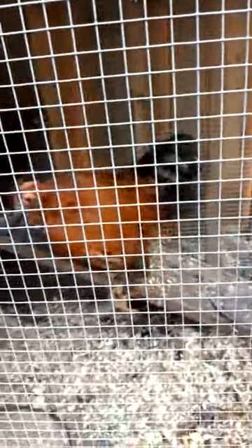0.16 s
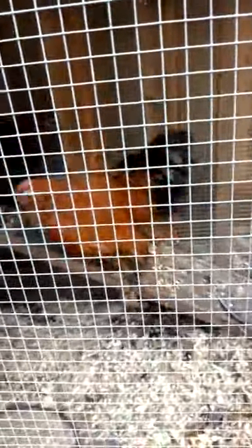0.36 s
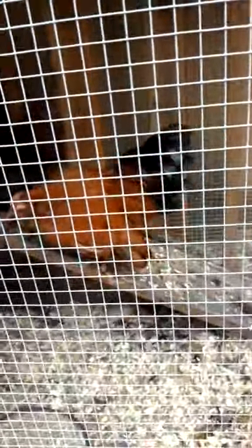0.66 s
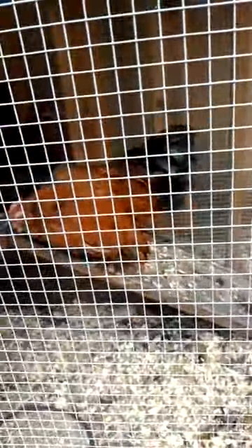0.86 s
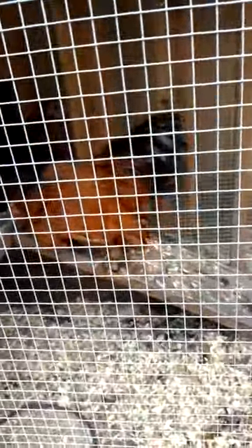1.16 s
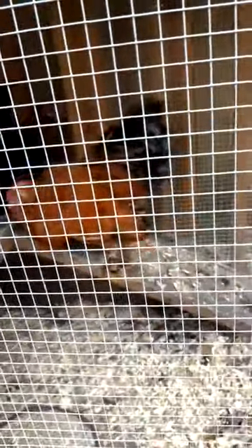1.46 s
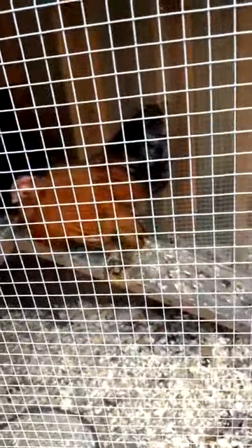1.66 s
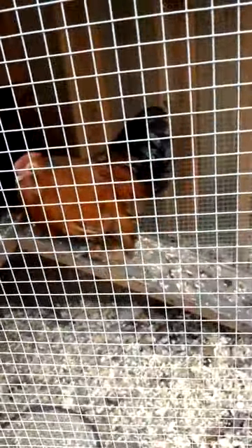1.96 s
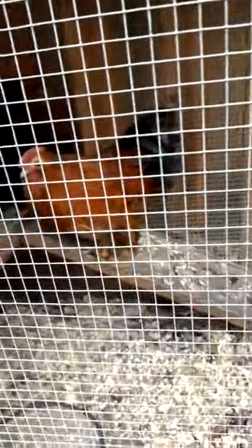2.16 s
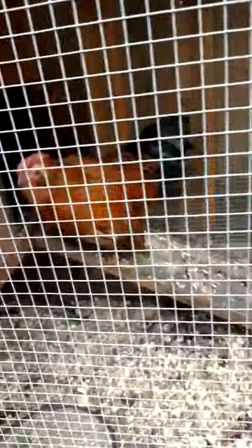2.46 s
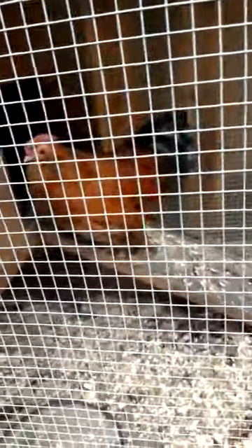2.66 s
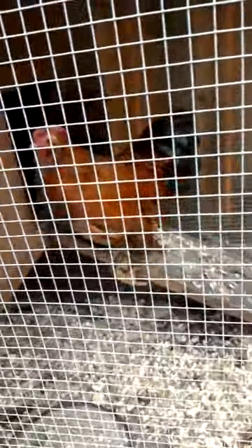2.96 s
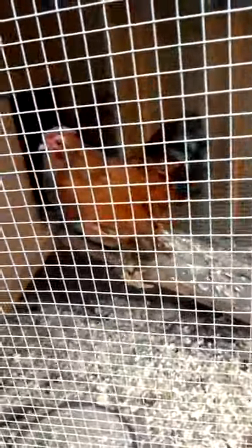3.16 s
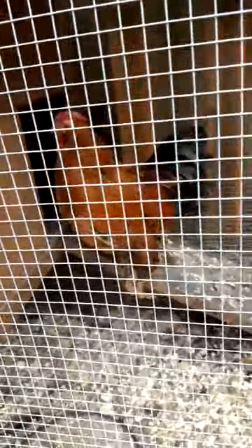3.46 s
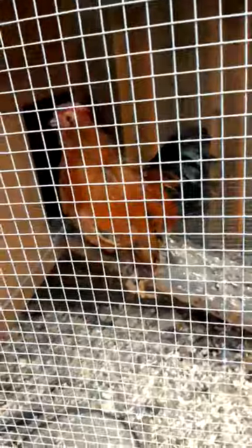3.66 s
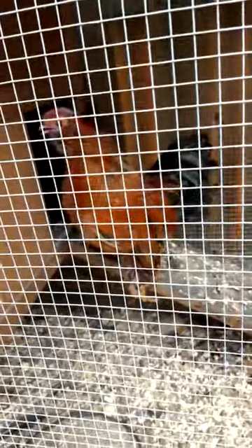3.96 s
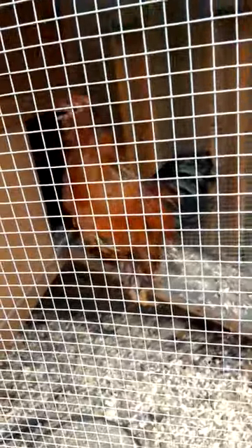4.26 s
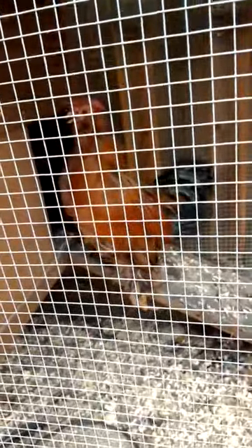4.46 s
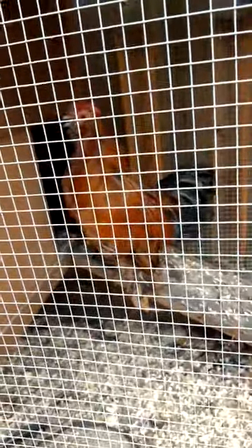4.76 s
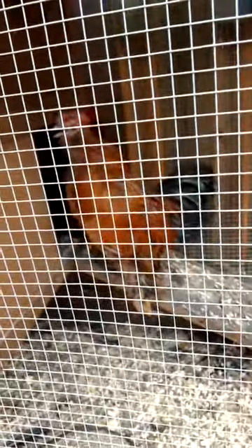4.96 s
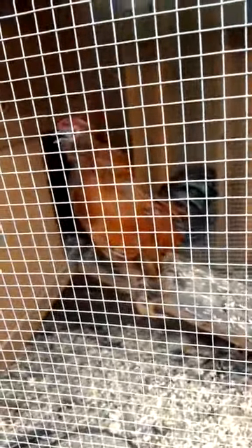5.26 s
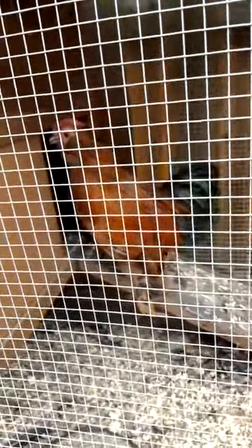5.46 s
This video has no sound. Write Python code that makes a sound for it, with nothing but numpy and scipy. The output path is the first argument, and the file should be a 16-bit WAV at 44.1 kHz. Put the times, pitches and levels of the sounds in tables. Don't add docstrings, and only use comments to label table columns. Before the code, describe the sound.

Close outdoor view of a wire-fronted wooden coop. A few low, soft clucks open, with claws ticking in shavings and toes thudding on a plank. Faint traffic hum and a thin, high songbird buzz sit far behind. After four seconds a small rooster crows loudly: a short note, a tiny gap, then a long breaking note that falls away as the background ducks.

```python
import sys
import numpy as np
from scipy import signal
from scipy.fft import rfft, irfft, next_fast_len
from scipy.io import wavfile
from scipy.ndimage import uniform_filter1d, minimum_filter1d, map_coordinates

SR = 44100
rng = np.random.default_rng(int(sys.argv[2]) if len(sys.argv) > 2 else 0)


def convert_level_to_amplitude(level_db):
    exponent = np.asarray(level_db, float) / 20
    return 10 ** exponent


def output_pcm(signal):
    pcm = np.clip(np.atleast_2d(signal).T, -1, 1) * 32767
    wavfile.write(sys.argv[1], SR, np.round(pcm).astype(np.int16))


N = 247401

# time_s, traffic_db, shavings_rustle_db
AIR = [(0.0, -60.5, -82), (0.35, -64.5, -79), (0.63, -67, -84), (1.0, -64, -92), (1.2, -67.5, -90),
       (1.39, -62, -84), (1.61, -67, -96), (1.9, -67, -84), (2.23, -67, -90), (2.57, -68, -92),
       (2.9, -66, -80), (3.2, -69, -93), (3.64, -67, -95), (4.1, -69.5, -92)]
# frequency_hz, density_db
TRAFFIC = [(25, -21.5), (62, 6), (139, -6), (500, -19.5), (772, -26), (1050, -19), (2500, -33.5),
           (4500, -120)]
# frequency_hz, density_db
HISS = [(900, -33), (1500, -7.5), (2900, -9), (5500, -14), (7700, -25), (10000, -22.5), (15700, -12)]
# frequency_hz, level_db
ENGINE = [(107.7, -66.5), (172.3, -68.5), (274.5, -73.5), (393.0, -78.5), (565.2, -88)]
# time_s, level_db
PASSING = [
    (2.7, -12),
    (3.0, -9),
    (3.55, 2),
    (3.9, -3),
    (4.1, -4),
]
# time_s, gain_db
GAIN = [
    (4.1, 7.5),
    (4.2, 4),
    (4.6, 9.5),
    (5.0, -5.5),
    (5.6, 2),
]
# start_s, length_s, level_db, pitch_hz
CHEEPS = [
    (0.94, .035, -62, 8000),
    (1.033, .12, -79, 3960),
]
# start_s, length_s, level_db
BUZZ = [
    (0.99, 0.21, -59),
    (2.048, 0.23, -59),
    (2.809, 0.304, -58),
    (3.46, 0.29, -56.5),
]
# frequency_hz, t60_s
COOP = [(500, 0.16), (1600, 0.16), (4200, 0.2), (11000, 0.15)]

# start_s, level_db, bright_over_hollow_db, t60_s
TICKS = [(0.14, -59, 7, .1), (0.1485, -54.5, 9, 0.14), (0.158, -39.5, 9.5, 0.095), (.2144, -28, 4, 0.033),
         (0.22, -35, 7, 0.03), (0.278, -38, 3.5, 0.084), (0.377, -56.5, 1.5, 0.071),
         (0.4356, -55, 6, 0.089), (0.4622, -47, -12, 0.044), (0.5023, -49, 7.5, 0.097),
         (0.566, -61.5, -3, 0.12), (0.8646, -60.5, 4, 0.097), (0.921, -41.5, 2, 0.051),
         (.966, -38, 2, 0.068), (1.3325, -53, -3.5, 0.081), (1.3383, -51, -16, 0.077),
         (1.424, -55, -3, 0.22), (1.432, -58, -13, 0.14), (1.8987, -52.5, 6, 0.056),
         (1.9377, -64, 1, 0.093), (1.981, -57.5, -7.5, 0.19), (2.0478, -42.5, -1, 0.063),
         (2.376, -36.5, 11.5, 0.059), (2.4018, -44.5, -2.5, 0.058), (2.4904, -63, -.5, 0.05),
         (2.5285, -54.5, -0.5, 0.16), (2.553, -48.5, 10, 0.053), (2.5948, -50, 4, 0.054),
         (2.7696, -49.5, 8.5, 0.1), (2.859, -62, 8, 0.11), (2.9388, -53, 5, 0.06), (3.085, -59, -12, .05)]
# start_s, level_db
THUDS = [(.1486, -44), (.161, -42), (.2144, -45), (0.279, -45.5), (.3513, -55), (.3759, -59), (.5039, -67),
         (.5654, -58), (0.8655, -60), (0.9197, -25), (.966, -39.5), (1.3365, -42.5), (1.4249, -45),
         (2.0485, -44), (2.376, -59), (2.5275, -54), (2.543, -46), (2.5532, -43), (2.5957, -48),
         (2.63, -54), (2.9392, -55)]
# start_s, level_db, ring_hz
RAPS = [(.2144, -38, 3500), (.2155, -42, 1650), (.5019, -51, 10000), (.921, -46, 3500), (.9225, -38, 830),
        (.966, -46, 8500), (1.3365, -45, 1650), (1.3374, -46, 1200), (1.429, -43, 1500), (1.431, -46, 4200),
        (1.8987, -51, 4300), (1.9375, -57, 8600), (1.985, -56, 8400), (2.0478, -46, 8800),
        (2.376, -50, 9000), (2.4016, -54, 4100), (2.5955, -52, 3310), (2.77, -56, 2750), (2.772, -49, 9000)]
# frequency_hz, width_hz, level_db
PLANK = [(169, 29, -13), (402, 53, 2.5), (610, 120, -9), (950, 210, -16.5)]
# frequency_hz, density_db
HOLLOW = [(880, -17), (1500, -5.5), (2880, -14), (3580, -4), (4620, -5.5), (5500, -10), (7150, -17),
          (12100, -120)]
# frequency_hz, density_db
BRIGHT = [(3240, -33.5), (5500, 0.5), (6420, -4.5), (8730, 2.5), (9740, 1.5), (14500, -18), (15700, -25.5)]

# start_s, length_s, pitch_hz, level_db, overtones_db
CLUCKS = [
    (0, 0.054, 402, -37.5, 5.5),
    (0.057, 0.0227, 382, -44.5, 6),
    (0.134, 0.0514, 428, -38.5, 10.5),
    (0.306, 0.0052, 350, -31.5, 14),
]
# frequency_hz, width_hz, level_db
HEN_THROAT = [(403, 62, 16), (810, 210, 2), (1260, 420, -4.5), (1600, 77, -5.5), (1920, 130, -14),
              (2290, 300, -34)]
# time_s, pitch_hz, level_db
PEEP = [
    (.287, 1046, -72),
    (.293, 950, -39),
    (.303, 700, -51),
]
CLUCK_SAG, CLUCK_SCOOP = 56, 0.019
CLUCK_ATTACK_S, CLUCK_FADE_DB, BEAK_SHUT_DB_PER_S = 0.009, 7.5, 192

NOTES = [
    [(4.114,), (4.285,)],
    [(4.408,), (5.455,)],
]
# start_s, first_hz, middle_hz, last_hz, chaos_periods
REGISTERS = [(4.114, 890, 895, 900, .07), (4.137, 900, 915, 928, .012), (4.15, 928, 942, 955, .003),
             (4.167, 909, 929, 922, .002), (4.231, 920, 920, 920, .2), (4.268, 915, 905, 900, .05),
             (4.407, 930, 900, 850, .03), (4.413, 825, 845, 885, .004), (4.425, 900, 960, 1040, .004),
             (4.434, 1085, 1170, 1208, .006), (4.447, 1210, 1228, 1215, .002),
             (4.476, 1215, 1198, 1165, .022), (4.497, 1150, 1095, 1065, .025), (4.513, 985, 940, 925, .02),
             (4.526, 1000, 1000, 960, .13), (4.561, 935, 912, 930, .055), (4.579, 930, 925, 920, .08),
             (4.596, 905, 935, 990, .018), (4.612, 1000, 1020, 1040, .08), (4.619, 1080, 1120, 1150, .03),
             (4.648, 1150, 1179, 1182, .001), (4.692, 1182, 1105, 1085, .001),
             (4.719, 1085, 1070, 1052, .04), (4.733, 1040, 1025, 1000, .08), (4.748, 950, 945, 950, .075),
             (4.765, 920, 935, 975, .016), (4.787, 1057, 1042, 1011, .0024), (4.937, 950, 944, 941, .02),
             (4.949, 941, 925, 899, .0012), (5.235, 938, 944, 947, .03), (5.258, 946, 944, 925, .002),
             (5.325, 921, 915, 905, .004), (5.355, 905, 890, 866, .01), (5.401, 866, 832, 780, .012),
             (5.424, 770, 610, 400, .04)]
ONSET_CHAOS, ONSET_S = .15, .004
SLIDE_CHAOS, SLIDE_S = 2e-6, .006
SLIDE_FREE, SLIDE_TOP = 600, 3500
# time_s, delay_periods
DOUBLING = [
    (5.236, 0),
    (5.238, .08),
    (5.34, .075),
    (5.41, .045),
    (5.43, .14),
]
# frequency_hz, width_hz, level_db
PIPE = [(870.7, 100, 0), (1921, 149, -3), (2330, 275, -2), (3256, 84, -5.5), (4450, 260, -44),
        (4668, 214, -6), (5740, 340, -56), (7537, 217, -10), (8175, 80, -6.5), (9040, 330, -27.5),
        (10010, 480, -31), (12800, 190, -31.5), (14100, 740, -40), (15500, 600, -44)]
# frequency_hz, width_hz, level_db
GAPING = [(949, 64, -6), (1656, 183, -10), (2358, 160, -5.5), (3266, 290, -13.5), (4706, 234, -1),
          (5330, 810, -27), (7460, 550, -28.5), (9525, 170, -13), (10850, 460, -25), (14000, 900, -53.5)]
# frequency_hz, width_hz, depth_share
SHUT_NOTCH = (6180, 300, 0.51)
PIPE_EDGES_HZ = [1330, 4000, 6200, 8900]
SHUT_DB = [1, -5, -13, -8, -7]
WIDE_DB = [1.5, -6, -13, -11.5, -10]
PRESS_SHARE = [0.021, 0.79, 0.85, 0.78, 0.76]
AIM_SHARE = [0.25, 0.048, 0.55, 0.6, 1.33]
# time_s, level_db
AIM = [(4.125, -17), (4.145, 10), (4.168, 5), (4.19, 1), (4.26, 3.5), (4.42, 0.5), (4.6, 1), (4.78, -4),
       (4.87, -10), (4.95, 1), (5.12, 2), (5.21, 6.5), (5.3, 0), (5.42, -2)]
# time_s, level_db, beak_opening_share, pressing_db
SHORT = [
    [(4.114, -45.5, 0.65, 11.5), (4.121, -39.5, 0.1, 13), (4.13, -10, 0, 8), (4.139, -1.5, 0, -2.5),
     (4.155, -3, 0.05, -2), (4.168, -5, 0.07, -1.5)],
    [(4.18, -4.5, .21, 0.5), (4.228, -3.5, 0.3, -3.5), (4.24, -12.5, .4, 13), (4.26, -11.5, 0.33, 14.5),
     (4.272, -11, 0.15, -4.5), (4.285, -17.5, .35, 0)],
]
# time_s, level_db, beak_opening_share, pressing_db
WARBLE = [
    [(4.408, -30.5, 1, 6.5), (4.418, -9, 0.97, 1.5), (4.431, -1, .89, -7.5), (4.44, -7, 0.81, 4.5),
     (4.466, -4, 0.99, 7.5), (4.49, -8, 0.6, -1), (4.508, -2.5, 0.7, -3), (4.52, -2.5, 0.6, -9),
     (4.538, -20, 1, 22)],
    [(4.555, -14, 0.83, 9), (4.568, -5.5, 1, 0.5), (4.585, -3.5, 0.72, -0.5), (4.593, -8.5, 0.93, 6),
     (4.607, -3, .83, 0), (4.614, -10.5, 0.64, 1.5), (4.623, -7, 0.66, 6)],
    [(4.65, -10.5, .88, 6.5), (4.675, -6.5, 1, 1), (4.715, -10, 0.57, 3), (4.74, -5, 0.94, 7),
     (4.762, -8, 0.71, 2.5), (4.778, -2, .78, -0.5), (4.787, -2.5, 0.54, -8)],
]
# time_s, level_db, beak_opening_share, pressing_db
HELD = [
    [(4.795, -6.5, 0.44, 4.8), (4.81, 1.5, 0.49, 5), (4.87, -14, 0.6, 1.2), (4.93, -10, 0.51, 7.5)],
    [(4.945, -7.5, 0.28, 0.5), (5.1, -8, 0.095, -0.5), (5.228, -6.5, 0.1, -1), (5.245, -10.5, 0.29, -0.5),
     (5.285, -10, .25, 2), (5.37, -8.5, 0.37, -7.5), (5.4, -7, 0.25, 3), (5.42, -15, 0.31, 0),
     (5.455, -30.5, 0.32, -11.5)],
]
# frequency_hz, level_db
WHISTLE = [(830, -10), (1650, -10), (2490, 3), (3230, -4), (4070, -19.5), (4890, -22), (9800, -9.5)]
# frequency_hz, level_db
RASP = [(1560, -6.5), (1875, 0.5), (2160, 2.5), (2370, -7), (2830, -9.5), (3050, -16), (3250, -12),
        (4400, -13), (7350, -8.5), (8050, -13.5)]
# start_s, length_s, level_db
WHISTLES = [
    (4.419, 0.02, -21),
    (4.52, 0.018, -18),
    (4.54, .024, -25.5),
    (4.582, 0.017, -13),
    (4.605, 0.041, -17.5),
    (4.738, 0.03, -12.5),
    (5.238, 0.028, -20),
    (5.411, 0.034, -29),
]
# start_s, length_s, level_db
RASPS = [
    (4.12, 0.023, -26.5),
    (4.228, 0.052, -16.5),
]


def unit(x):
    return x / np.sqrt(np.mean(x ** 2) + 1e-20)


def along(points, hz):
    f, v = np.transpose(points)
    return np.interp(np.log(hz + 1), np.log(f + 1), v)


def curves(rows):
    s, *cols = np.transpose(rows)
    return [np.interp(np.arange(N) / SR, s, c) for c in cols]


def within(starts, lengths):
    t = np.arange(N) / SR
    k = np.maximum(np.searchsorted(starts, t) - 1, 0)
    return k, np.clip((t - starts[k]) / lengths[k], 0, 1)


def sounding(tables, fade):
    t = np.arange(N) / SR
    gates = []
    for rows in tables:
        inside = np.minimum(t - rows[0][0], rows[-1][0] - t)
        gates.append(np.clip(inside / fade + 1, 0, 1))
    return np.max(gates, axis=0)


def wobble(rate):
    at = np.arange(0, N + 8, 8)
    knots = rng.standard_normal(int(N * rate / SR) + 4)
    return np.interp(np.arange(N), at, map_coordinates(knots, [at * rate / SR], order=2))


def filtered(x, response):
    m = next_fast_len(len(x) + 8192)
    return irfft(rfft(x, m) * response(np.fft.rfftfreq(m, 1 / SR)), m)[:len(x)]


def resonances(modes):
    def response(f):
        total = 0
        for k, (centre, width, db) in enumerate(modes):
            damping = 1j * f * width
            total = total + (-1) ** k * convert_level_to_amplitude(db) * damping / (centre ** 2 - f ** 2 + damping)
        return total
    return response


def noise(spectrum, size=N):
    return unit(filtered(rng.standard_normal(size), lambda hz: convert_level_to_amplitude(along(spectrum, hz))))


def steady(x, span):
    return x / np.sqrt(np.abs(uniform_filter1d(x ** 2, int(span * SR))) + 1e-12)


def pulses(pitch_hz, chaos, late, scatter, weak):
    turns = np.cumsum(pitch_hz) / SR
    k = np.arange(1, int(turns[-1]))
    at = np.interp(k, turns, np.arange(N))
    i = at.astype(int)
    luck = rng.standard_normal((N // 20, 2))[:len(k)]
    swing = late[i] * (-1) ** k
    at = at + (chaos[i] * luck[:, 0] + swing) * SR / pitch_hz[i]
    size = 1 + scatter * chaos[i] * luck[:, 1] - weak * swing
    taps = np.floor(at)[:, None] + np.arange(-15, 17)
    offset = taps - at[:, None]
    shape = np.sinc(offset) * np.cos(np.pi * offset / 32) ** 2
    return np.bincount(np.clip(taps, 0, N - 1).astype(int).ravel(), (size[:, None] * shape).ravel(), N)


def patchy(x, depth_db):
    z = signal.stft(x, nperseg=512)[2]
    field = rng.standard_normal(z.shape)
    for axis in (-2, -1, -2, -1):
        field = uniform_filter1d(field, size=7, axis=axis)
    return signal.istft(z * convert_level_to_amplitude(depth_db * unit(field)), nperseg=512)[1][..., :N]


def air():
    traffic_db, rustle_db = curves(AIR)
    hum = noise(TRAFFIC) * convert_level_to_amplitude(traffic_db + 1.2 * wobble(3.2) + 0.53 * wobble(17))
    turns = np.cumsum(1 + 0.071 * wobble(7.9)) / SR
    engine = sum(convert_level_to_amplitude(db - 3.0) * np.sin(2 * np.pi * hz * turns) for hz, db in ENGINE)
    engine = engine * convert_level_to_amplitude(curves(PASSING)[0])
    rustle = noise(BRIGHT) * convert_level_to_amplitude(rustle_db + 2.2 * wobble(25) + 2.3 * wobble(300))
    hiss = convert_level_to_amplitude(-83.5) * noise(HISS)
    return (hum + engine + rustle + hiss) * convert_level_to_amplitude(curves(GAIN)[0])


def cheeps():
    start, length, cheep_db, cheep_hz = np.transpose(CHEEPS)
    k, u = within(start, length)
    turns = np.cumsum(cheep_hz[k] * (1 + .012 * wobble(90))) / SR
    swell = np.sqrt(np.abs(np.sin(np.pi * u)))
    return np.sin(2 * np.pi * turns) * convert_level_to_amplitude(cheep_db[k] + 2.5 * wobble(58.4)) * swell


def songbird():
    start, length, phrase_db = np.transpose(BUZZ)
    k, u = within(start, length)
    level_db = phrase_db[k] + np.interp(u, [0, 0.53, 1], [-8.5, 0, -17])
    shake = np.sin(2 * np.pi * np.cumsum(98 + 12 * wobble(51)) / SR)
    pitch_hz = 7510 - 89.5 * u + 180 * shake + 90 * wobble(240)
    whistle = np.sin(2 * np.pi * np.cumsum(pitch_hz) / SR)
    phrases = sounding([[(s,), (s + span,)] for s, span, _ in BUZZ], 0.022)
    return whistle * convert_level_to_amplitude(level_db + 2.4 * wobble(41.1)) * phrases


def coop(x):
    hz, t, z = signal.stft(rng.standard_normal(SR // 3), SR, nperseg=256)
    walls = convert_level_to_amplitude(-60 * t / along(COOP, hz)[:, None])
    yard = convert_level_to_amplitude(-29.0 - 60 * t / 0.5) / (1 + (hz[:, None] / 3500) ** 3)
    tail = signal.istft(z * (walls + yard), SR, nperseg=256)[1]
    return signal.fftconvolve(np.pad(x, (150, 0)), tail / np.linalg.norm(tail))[:N]


def grit_tick(t, bright_db, t60_s):
    clumps = rng.standard_normal(len(t) // 30 + 1).repeat(30)[:len(t)]
    hollow = convert_level_to_amplitude(min(-bright_db, 0)) * noise(HOLLOW, size=len(t))
    grit = hollow + convert_level_to_amplitude(min(bright_db, 0)) * noise(BRIGHT, size=len(t))
    chips = [(hz, 700, -2) for hz in np.sort(rng.uniform(1600, 10220, size=5))]
    grit = grit + filtered(grit, resonances(chips))
    crack = convert_level_to_amplitude(-2 - 60 * t / 0.0034) * unit(grit)
    scrape = convert_level_to_amplitude(-4.0 - 60 * (t / np.clip(t60_s, .01, .2)) ** 0.84) * grit * convert_level_to_amplitude(2.7 * clumps)
    return (crack + scrape) * np.minimum(t * SR / 8, 1)


def struck_wood(t, modes, t60_s, attack_s):
    ring = unit(filtered(rng.standard_normal(len(t)), resonances(modes)))
    return ring * convert_level_to_amplitude(-60 * t / t60_s) * np.minimum(t / attack_s, 1)


def claws():
    out, t = np.zeros(N + SR), np.arange(SR // 8) / SR

    def add(s, level_db, sound):
        out[round(s * SR):][:len(t)] += convert_level_to_amplitude(level_db) * sound

    for s, tick_db, bright_db, t60_s in TICKS:
        add(s, tick_db, grit_tick(t, bright_db, t60_s))
    for s, thud_db in THUDS:
        add(s, thud_db - 5.0, struck_wood(t, PLANK, t60_s=.085, attack_s=0.0057))
    for s, rap_db, ring_hz in RAPS:
        add(s, rap_db - 0.5, struck_wood(t, [(ring_hz, 300, 0)], t60_s=0.029, attack_s=0.00047))
    return out[:N]


def hen():
    start, length, cluck_hz, cluck_db, open_db = np.transpose(CLUCKS)
    k, u = within(start, length)
    passed_s = u * length[k]
    pitch_hz = cluck_hz[k] * (1 - CLUCK_SAG * passed_s ** 2 - CLUCK_SCOOP * (1 - u) ** 4)
    puffs = pulses(pitch_hz, np.full(N, .002), np.zeros(N), scatter=3., weak=0)
    open_db = open_db[k] - BEAK_SHUT_DB_PER_S * passed_s
    overtones = convert_level_to_amplitude(open_db) * filtered(puffs, resonances(HEN_THROAT[1:]))
    throat = filtered(puffs, resonances(HEN_THROAT[:1])) - overtones
    throat = filtered(throat, lambda hz: 1 / (1 + (hz / 2150) ** 7))
    breaths = [[(s + CLUCK_ATTACK_S * (s > 0),), (s + span,)] for s, span, *_ in CLUCKS]
    clucks = steady(throat, 0.024) * convert_level_to_amplitude(cluck_db[k] - CLUCK_FADE_DB * u ** 2)
    clucks = clucks * sounding(breaths, CLUCK_ATTACK_S)
    peep_hz, peep_db = curves(PEEP)
    peep = np.sin(2 * np.pi * np.cumsum(peep_hz) / SR) * convert_level_to_amplitude(peep_db)
    return clucks + peep * sounding([PEEP], .003)


def membranes():
    start, first, middle, last, calm = np.transpose(REGISTERS)
    k, u = within(start, np.diff(start, append=NOTES[-1][-1][0]))
    bend = 2 * u * (1 - u) * (2 * middle - first - last)[k]
    pitch_hz = first[k] * (1 - u) + last[k] * u + bend
    slide = uniform_filter1d(np.abs(np.gradient(pitch_hz)) * SR, int(SLIDE_S * SR))
    t = np.arange(N) / SR
    onset = sum(np.exp(-np.abs(t - note[0][0]) / ONSET_S) for note in NOTES)
    chaos = uniform_filter1d(calm[k], size=200) + ONSET_CHAOS * onset
    chaos = chaos + SLIDE_CHAOS * np.clip(slide - SLIDE_FREE, 0, SLIDE_TOP)
    return pitch_hz, chaos, curves(DOUBLING)[0]


def column(modes, spells):
    start, length, spell_db = np.transpose(spells)
    k, u = within(start, length)
    lines = 0
    for hz, db in modes:
        turns = np.cumsum(hz * (1 + .025 * wobble(70))) / SR
        lines = lines + convert_level_to_amplitude(db + 4.8 * wobble(90)) * np.sin(2 * np.pi * turns)
    return lines * convert_level_to_amplitude(spell_db[k]) * np.sqrt(np.abs(np.sin(np.pi * u)))


def shut_pipe(hz):
    notch_hz, width_hz, depth = SHUT_NOTCH
    return resonances(PIPE)(hz) * (1 - depth * np.exp(-((hz - notch_hz) / width_hz) ** 2))


def beak_radiation(hz):
    radiated = 1 / (1 + (580 / (hz + 1)) ** 4) / (1 + (290 / (hz + 1)) ** 9)
    sacs = 1
    for centre_hz, width_hz, depth in [(1360, 90, 0.38), (6100, 300, .5), (2770, 110, 0.5)]:
        sacs = sacs - depth * np.exp(-((hz - centre_hz) / width_hz) ** 2)
    return radiated * sacs


def rooster():
    pitch_hz, chaos, late = membranes()
    drift = 0.0013 * wobble(45) + .001 * wobble(130) + .35 * chaos * wobble(140)
    pitch_hz = uniform_filter1d(pitch_hz, size=130) * (1 + drift)
    late = late + 0.3 * chaos * wobble(60)
    puffs = pulses(pitch_hz, .42 * chaos, late, scatter=3., weak=3.2)

    level_db, wide, press_db = curves([row for part in [*SHORT, *WARBLE, *HELD] for row in part])
    wide = np.clip(wide, 0, 1)
    pipe = (1 - wide) * filtered(puffs, shut_pipe) + wide * filtered(puffs, resonances(GAPING))
    below = [filtered(pipe, lambda hz, edge=edge: 1 / (1 + (hz / edge) ** 24)) for edge in PIPE_EDGES_HZ]
    bands = np.diff([0 * pipe] + below + [pipe], axis=0)
    bands[2:] = patchy(bands[2:], depth_db=5.5)

    groups_db = np.outer(SHUT_DB, 1 - wide) + np.outer(WIDE_DB, wide)
    groups_db = groups_db + np.outer(PRESS_SHARE, press_db) + np.outer(AIM_SHARE, curves(AIM))
    bursts_db = [1.1 * wobble(30) + 26 * np.minimum(chaos, .09) * wobble(110) for _ in bands]
    voice = steady(np.sum(bands * convert_level_to_amplitude(groups_db + bursts_db), axis=0), 0.021) * convert_level_to_amplitude(level_db + 0.5)
    voice = voice + column(WHISTLE, WHISTLES) + column(RASP, RASPS)
    return filtered(voice * sounding(NOTES, 1 / 400), beak_radiation)


def scene():
    far, steps, clucks, crow = songbird(), claws(), hen(), rooster()
    sent = convert_level_to_amplitude(-12.5) * crow + convert_level_to_amplitude(-8) * clucks + convert_level_to_amplitude(-9.0) * steps + convert_level_to_amplitude(-5.0) * far
    near = crow + clucks + steps
    return (near + convert_level_to_amplitude(-7.0) * far + coop(sent) + air() + cheeps())[None]


def top_cut(x):
    return signal.sosfilt(signal.butter(12, 15890, fs=SR, output="sos"), x)


def record(dry):
    heard = filtered(dry[0], lambda hz: (hz < 15880) / (1 + (hz / 15700) ** 40) / (1 + (48 / (hz + 1)) ** 4))
    bent = filtered(heard ** 2, lambda hz: (hz < 4000) / (1 + (170 / (hz + 1)) ** 4))
    heard = heard + convert_level_to_amplitude(-31.0) * bent
    needed = minimum_filter1d(np.minimum(.98 / (np.abs(heard) + 1e-9), 1), size=500)
    limited = heard * uniform_filter1d(needed, size=400)
    return top_cut(limited[None])


dry = scene()
out = record(dry)
output_pcm(out)
```